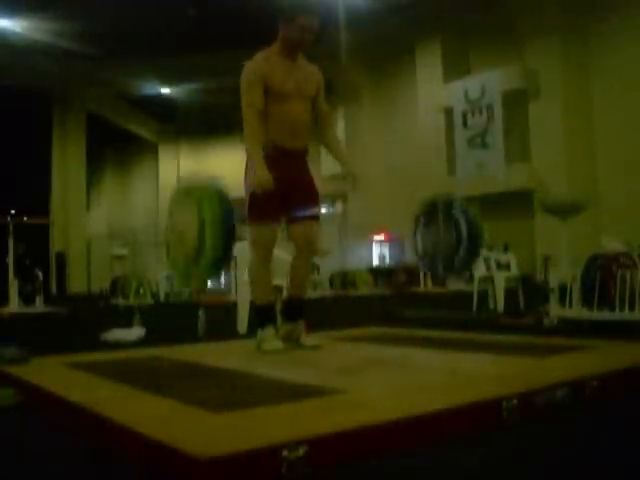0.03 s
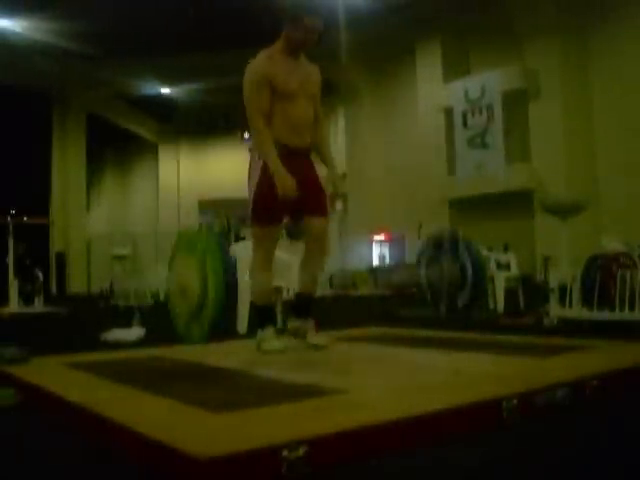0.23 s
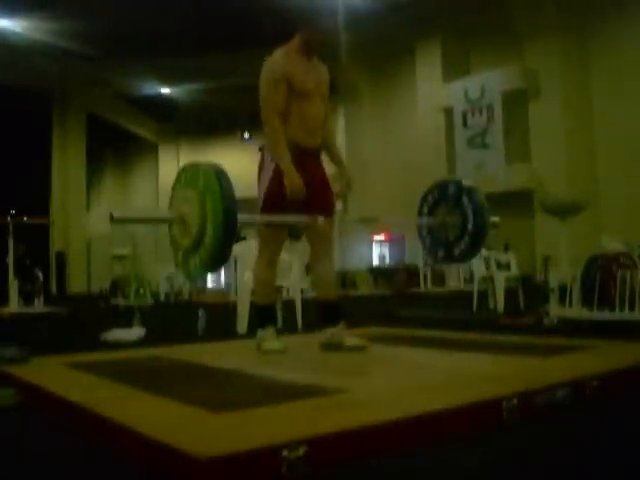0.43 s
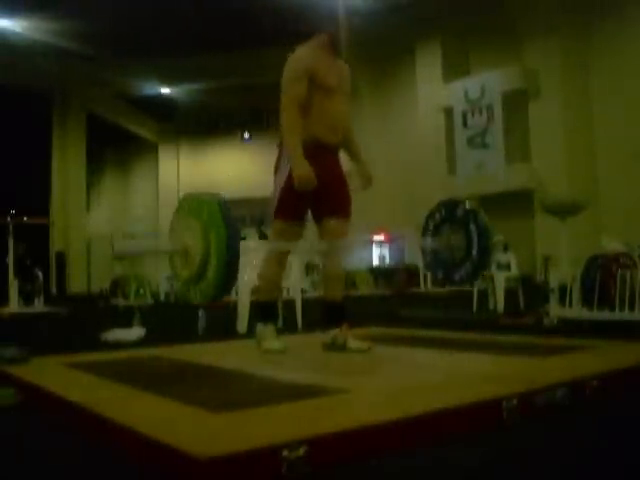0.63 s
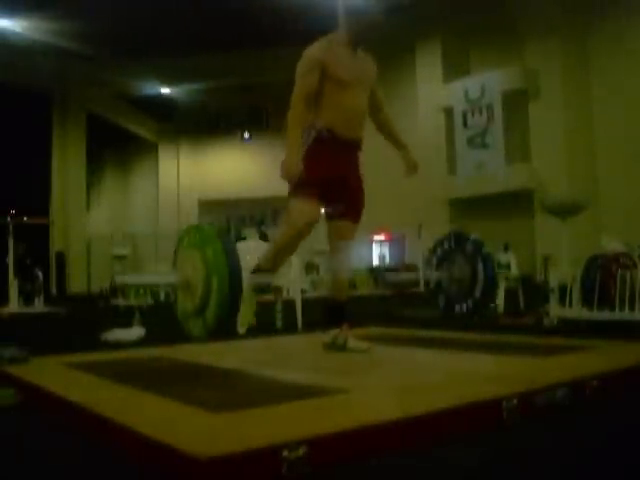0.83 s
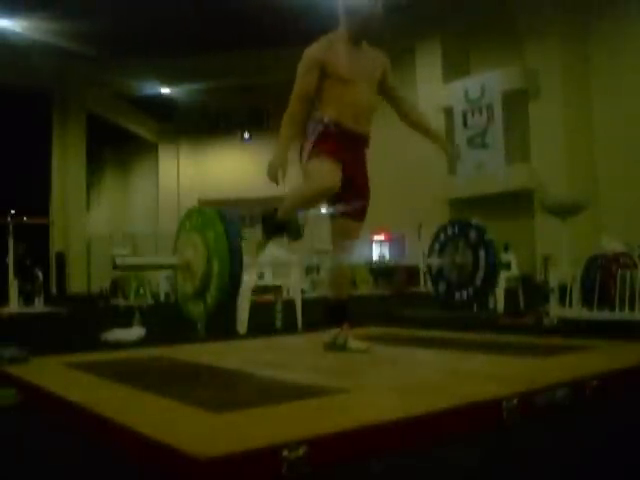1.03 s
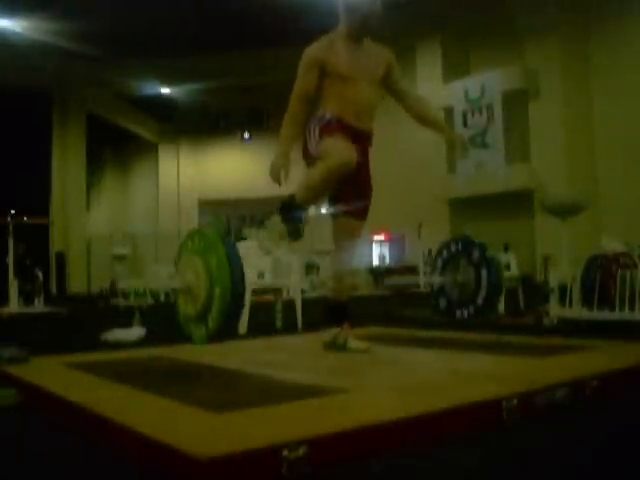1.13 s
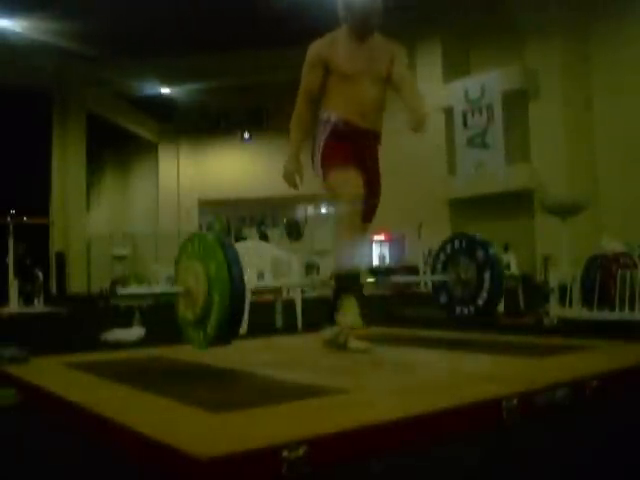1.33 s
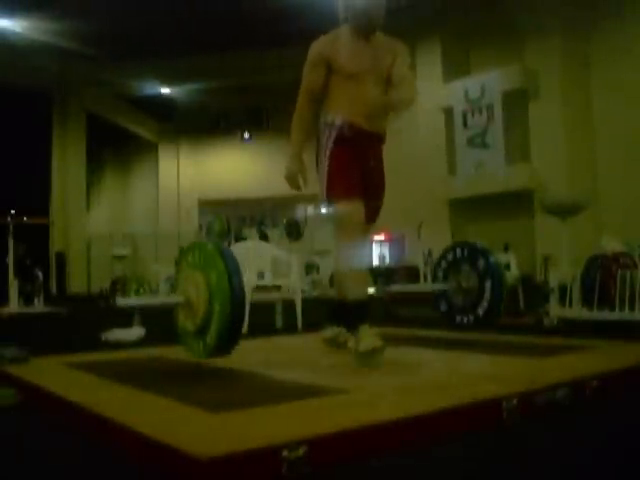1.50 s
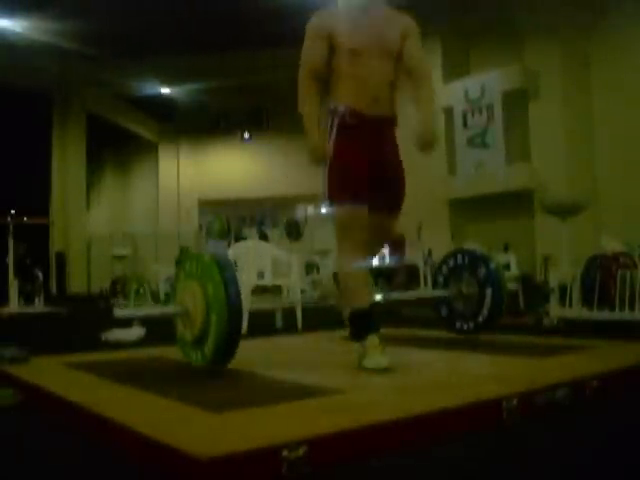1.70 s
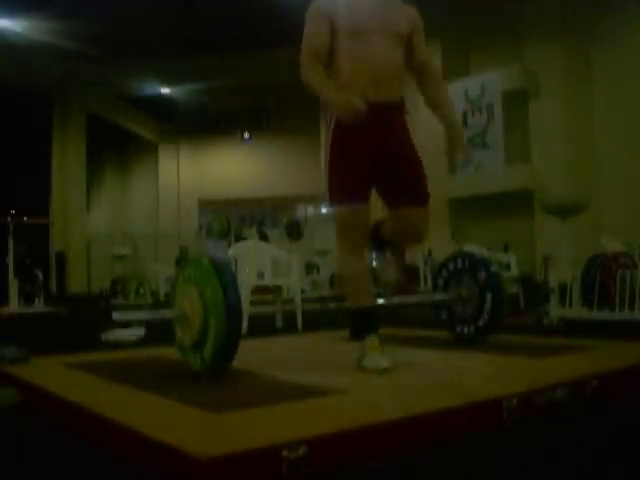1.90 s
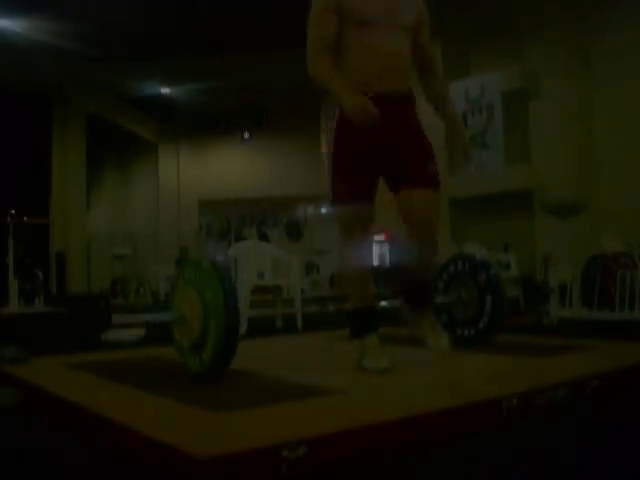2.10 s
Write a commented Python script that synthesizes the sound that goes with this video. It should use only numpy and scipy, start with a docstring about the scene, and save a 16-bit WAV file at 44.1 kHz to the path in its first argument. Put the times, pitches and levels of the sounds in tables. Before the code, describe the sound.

A loaded barbell with rubber plates slams onto a wooden platform, steel rattling, then bounces three more times, ever softer; a footstep knocks between the last bounces. Large echoing gym, rumbling; small microphone overloading on the first hit.

```python
"""A big hard hall rumbles under a thin, slightly wavering whine: shaped noise, noise humps and a sine.
A loaded barbell lands on a wooden platform and bounces more softly each time: half-sine pushes and dull
noise knock as rubber plates and ring the boards; random clicks rattle as steel sleeves and plate hubs.
Amid the last bounces the lifter steps on the boards, in low-passed noise with a wooden boom.
Hall noise follows the impacts; a small microphone softly clips the peaks and the sound sinks at the end."""
import sys
import numpy as np
from scipy import signal
from scipy.fft import rfft, irfft, next_fast_len
from scipy.io import wavfile
from scipy.ndimage import uniform_filter1d

SR = 44100
rng = np.random.default_rng(int(sys.argv[2]) if len(sys.argv) > 2 else 0)


def volts_from_db(level):
    """Convert decibel levels to linear amplitude ratios."""
    exponent = np.asarray(level, float) / 20
    return 10 ** exponent


def dump(signal):
    """Clip the signal to [-1, 1] and save it as 16-bit WAV at the path in sys.argv[1]."""
    limited = np.clip(np.atleast_2d(signal).T, -1, 1)
    pcm = np.round(limited * 32767).astype(np.int16)
    wavfile.write(sys.argv[1], SR, pcm)


N = 94815
LEAD_S = 1  # run-up ahead of time 0, cut off in scene()
M = N + LEAD_S * SR
# modes of the wooden platform: mode_hz, relative_level_db, t60_s
BOARDS = [(45, 0, 0.2), (92, -21, 0.092), (134, 4, 0.041), (177, -3, 0.079), (242.3, -3.5, 0.13),
          (358, -8.5, 0.068), (497, -5, 0.037), (730, -12, 0.017)]


def at(s):
    """Sample index of a time."""
    return int(round((s + LEAD_S) * SR))


def unit(x):
    """Scale to rms 1."""
    return x / np.sqrt(np.mean(x ** 2) + 1e-30)


def shape(x, points):
    """Colour a signal with (Hz, dB) points, joined on a log frequency axis."""
    hz, db = np.array(points).T
    size = next_fast_len(len(x))
    f = np.maximum(np.arange(size // 2 + 1) * SR / size, 1)
    gain = volts_from_db(np.interp(np.log(f), np.log(hz), db))
    return irfft(rfft(x, size) * gain, size)[:len(x)]


def band(x, hz, width):
    """Second-order band-pass."""
    return signal.lfilter(*signal.iirpeak(hz, hz / width, fs=SR), x)


def dull(hz):
    """Low-passed noise, rms 1."""
    sos = signal.butter(4, hz, fs=SR, output="sos")
    return unit(signal.sosfilt(sos, rng.standard_normal(M)))


def ring(x, modes):
    """Sum of decaying two-pole resonances driven by x."""
    out = 0
    for hz, db, t60 in modes:
        r = np.exp(-np.log(1000) / (t60 * SR))
        w = 2 * np.pi * hz / SR
        out = out + volts_from_db(db) * signal.lfilter([0, r * np.sin(w)], [1, -2 * r * np.cos(w), r * r], x)
    return out


def burst(start, length):
    """Envelope of a contact: quick rise, hold until length after the start, exponential release."""
    attack_s, release_s = 0.0016, 0.0057
    t = np.arange(M) / SR - LEAD_S - start
    return np.clip(t / attack_s, 0, 1) * np.exp(-np.clip(t - length, 0, None) / release_s)


def walk(rate):
    """Smoothed random curve, rms 1, through rate new values per second."""
    k = int(SR / rate)
    held = np.repeat(rng.standard_normal(M // k + 1), k)
    return unit(uniform_filter1d(held, k)[:M])


def background():
    """Hall rumble of shaped noise, flickering band-passed humps, and a thin sine whine."""
    # spectrum of the rumble: band_hz, relative_density_db
    rumble_spectrum = [(20, 3), (45, 5.5), (150, -8), (400, -7), (1000, -20), (2000, -17), (4000, -18.5),
                       (8000, -32.5), (15600, -43)]
    # humps standing out of the rumble: centre_hz, width_hz, level_db before the slow level curve
    humps = [(143, 43, -33), (770, 120, -34), (1361, 84, -36.5), (400, 59, -38)]
    # slow level curve of humps and whine: time_s, gain_db
    hum_level = [(0, 1.5), (.8, -0.5), (1.45, -2.5), (1.8, -2), (2.15, -2.5)]
    rumble_db, whine_hz, whine_db = -29, 7865, -48
    flicker_db, flicker_per_s = 2.0, 16

    t = np.arange(M) / SR
    whine_level = volts_from_db(whine_db + 1.1 * walk(29.3))
    hum = np.sqrt(2) * whine_level * np.sin(2 * np.pi * whine_hz * t)
    for hz, width, db in humps:
        hump = unit(band(rng.standard_normal(M), hz, width))
        hum = hum + volts_from_db(db + flicker_db * walk(flicker_per_s)) * hump
    level = volts_from_db(np.interp(t - LEAD_S, *np.array(hum_level).T))
    rumble = unit(shape(rng.standard_normal(M), rumble_spectrum))
    return volts_from_db(rumble_db) * rumble + level * hum


def thuds():
    """A half-sine push and a rough knock of each rubber landing; the push sets the boards ringing."""
    # rubber plates landing: start_s, relative_level_db, contact_s
    landings = [(0.2386, 5.5, 0.0031), (.2450, -7, 0.0036), (0.831, -4.5, 0.0019), (0.842, -5.5, .003),
                (1.2690, -9, 0.0024), (1.276, -11, 0.0041), (1.839, -15, 0.0034)]
    knock_db, knock_hz, knock_s = -14, 630, 0.010

    push = np.zeros(M)
    knock_level = 0
    for s, db, contact in landings:
        n = int(contact * SR)
        push[at(s):at(s) + n] -= volts_from_db(db) * np.sin(np.pi * np.arange(n) / n)
        # the knock begins as the push ends
        knock_level = knock_level + volts_from_db(db + knock_db) * burst(s + contact, knock_s)
    knock = dull(knock_hz) * knock_level
    return 1.47 * push + knock + 0.0033 * ring(push, BOARDS)


def hall(x):
    """Diffuse field: noise in each band follows an energy that builds up, then decays early and late."""
    # reverberation of the hall: band_hz, t60_s, relative_level_db
    reverb = [(59.6, 3.3, -19), (150, 1.3, -15.5), (420, 1.6, -13.5), (1030, 2.9, -7.5), (1880, 1.65, -11),
              (3240, 2.3, -10), (5560, 1.66, -8), (8330, 1.46, -11), (13050, 1.24, -13)]
    early_db, early_t60_s, onset_s = -6.5, 0.15, 0.01

    t = np.arange(2 * SR) / SR
    noise = rng.standard_normal(M)

    def decay(t60):
        # about unit energy in total
        return volts_from_db(-60 * t / t60) * np.sqrt(2 * np.log(1000) / t60 / SR)

    out = 0
    for k, (hz, t60, db) in enumerate(reverb):
        # band shape: 0 dB at its own frequency, -4 dB halfway to each neighbour, -60 dB beyond
        part = []
        for j, (other_hz, _, _) in enumerate(reverb):
            if abs(j - k) == 1:
                part.append((np.sqrt(other_hz * hz), -4))
            else:
                part.append((other_hz, -60 * (j != k)))
        tail = decay(t60) + volts_from_db(early_db) * decay(early_t60_s)
        tail = volts_from_db(db) * tail * np.clip(t / onset_s, 0, 1)
        energy = signal.fftconvolve(shape(x, part) ** 2, tail ** 2)[:M]
        out = out + unit(shape(noise, part)) * np.sqrt(np.clip(energy, 0, None))
    return out


def rattles():
    """Dense uneven clicks, direct and through the hall, ring the steel modes and clatter broadly."""
    # steel chattering on steel: start_s, relative_level_db, treble_tilt_db, length_s
    chatter = [(0.2407, -6.5, 7, .013), (0.2596, -4, 2.5, 0.037), (.8361, -6.5, 1, 0.015),
               (0.8679, -7.5, 1.5, 0.03), (1.2751, -8, 1.5, 0.013), (1.3027, -13.5, 1.5, 0.0099),
               (1.3173, -9.5, 3.5, 0.014), (1.3695, -19.5, -4, 0.008), (1.5403, -21.5, 10, 0.0026),
               (1.5817, -29.5, 8.5, 0.023), (1.6041, -15, 0, 0.014), (1.842, -20.5, 1.5, 0.01),
               (1.8596, -26.5, -9.5, 0.027), (1.9051, -27, -13, 0.0071), (2.041, -31.5, -2.5, 0.015),
               (2.1084, -34, 6, 0.014)]
    # bar, sleeve and hub modes: mode_hz, relative_level_db, t60_s
    steel = [(1940, 3, 0.012), (2320, 11, 0.0064), (2530, 0, 0.011), (3035, -25, 0.045), (3170, 1, 0.052),
             (3500, 13.5, 0.0053), (4190, 6.5, 0.0053), (5440, -43, 0.029), (5595, 2, 0.053),
             (5510, -4, 0.031), (5974, 3.5, 0.044), (6500, 1, 0.019), (7376, -24, 0.048),
             (7840, -11, 0.058)]
    # broad clatter of the contacts: band_hz, relative_density_db
    clatter = [(240, -31), (400, -8), (1320, -6.5), (3020, 3.5), (3630, -1.5), (5400, -0.5), (6400, -3),
               (7690, -2.5), (9530, -11), (15600, -16)]
    clatter_db, ring_db = 2, -7
    clicks_per_s, click_spread_db, click_top_db = 5000, 5, 9

    u = rng.random((3, M))
    struck = u[0] < clicks_per_s / SR
    click_db = np.minimum(-click_spread_db * np.log(1 - u[2]), click_top_db)
    clicks = unit(struck * np.sign(u[1] - 0.5) * volts_from_db(click_db))

    drive = sum(volts_from_db(db) * burst(s, n) for s, db, _, n in chatter)
    bright = sum(volts_from_db(db + tilt) * burst(s, n) for s, db, tilt, n in chatter)
    low = signal.sosfiltfilt(signal.butter(2, 3800, fs=SR, output="sos"), clicks)
    hits = low * drive + (clicks - low) * bright
    hits = hits + hall(hits)

    # each colouring is scaled to rms 1 for unbroken clicks
    broad = shape(hits, clatter) / np.sqrt(np.mean(shape(clicks, clatter) ** 2))
    ringing = ring(hits, steel) / np.sqrt(np.mean(ring(clicks, steel) ** 2))
    return volts_from_db(clatter_db) * broad + volts_from_db(ring_db) * ringing


def steps():
    """Soles knock as dull rough noise; the same noise, with its own levels, makes the boards boom."""
    # feet on the boards: start_s, relative_level_db, length_s, boom_over_step_db
    footfalls = [(1.51, -1, 0.0094, 2.5), (1.523, -10, 0.016, 0.5), (1.543, -22, 0.018, -5),
                 (1.565, -11.5, 0.034, -5), (1.614, -17, 0.048, -9), (2.072, -13.5, 0.018, -2),
                 (2.094, -17.5, 0.008, -7.5)]
    sole_hz, sole_low_hz, sole_db = 850, 119, -5

    rough = dull(sole_hz)
    thin = signal.sosfilt(signal.butter(2, sole_low_hz, "high", fs=SR, output="sos"), rough)
    knock = thin * sum(volts_from_db(db) * burst(s, n) for s, db, n, _ in footfalls)
    boom = rough * sum(volts_from_db(db + boom_db) * burst(s, n) for s, db, n, boom_db in footfalls)
    return volts_from_db(sole_db) * knock + 0.0056 * ring(boom, BOARDS)


def scene():
    """All sources in the hall, without the run-up."""
    wood = thuds() + steps()
    mix = wood + hall(wood) + rattles() + background()
    return mix[None, -N:]


def band_limit(x):
    """A steep low-pass at the top of the band."""
    return signal.sosfilt(signal.butter(12, 15700, fs=SR, output="sos"), x)


def record(dry):
    """The small microphone thins the bass and softly clips loud peaks; the level then wavers and sinks."""
    # level after the clipping: time_s, gain_db
    fade_points = [(0, 0), (.8, -2.5), (.92, 0.5), (1.05, -2.5), (1.28, -3.5), (1.51, -5), (1.85, -4),
                   (2.15, -8.5)]
    mic_low_hz, drive_db, knee = 65.5, 1, 2.9  # a higher knee clips more sharply

    x = signal.sosfilt(signal.butter(2, mic_low_hz, "high", fs=SR, output="sos"), dry)
    x = x * volts_from_db(drive_db)
    x = x / (1 + np.abs(x) ** knee) ** (1 / knee)
    fade = volts_from_db(np.interp(np.arange(N) / SR, *np.array(fade_points).T))
    return band_limit(x * fade)


dry = scene()
out = record(dry)
dump(out)
```